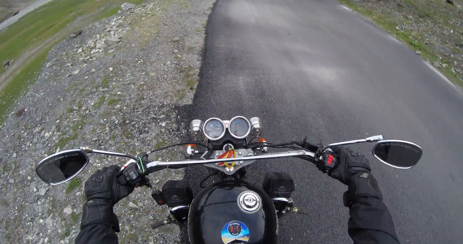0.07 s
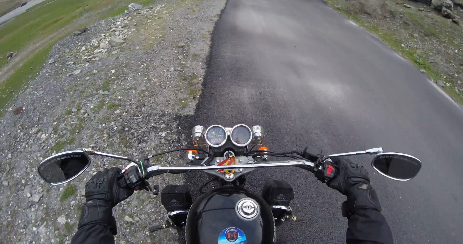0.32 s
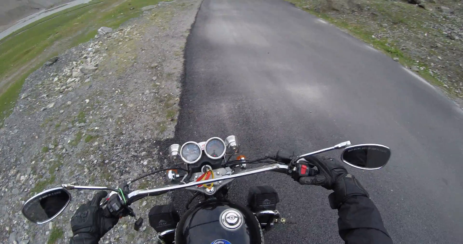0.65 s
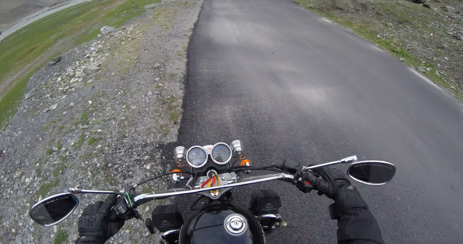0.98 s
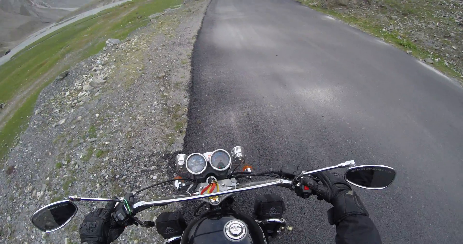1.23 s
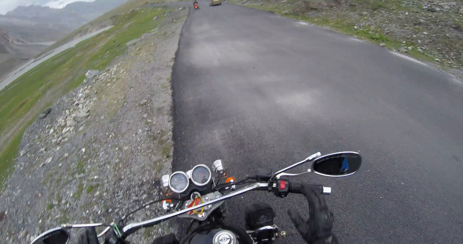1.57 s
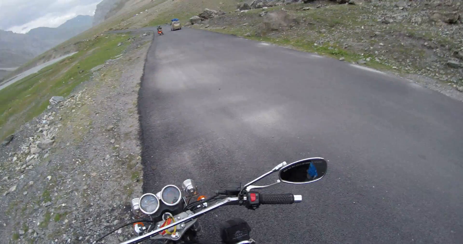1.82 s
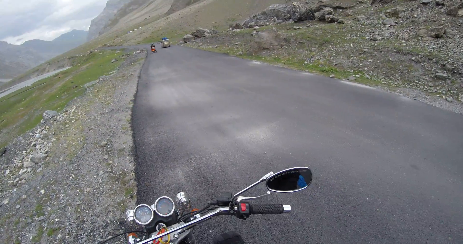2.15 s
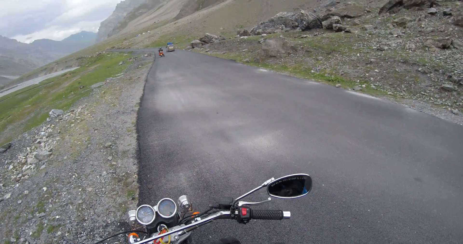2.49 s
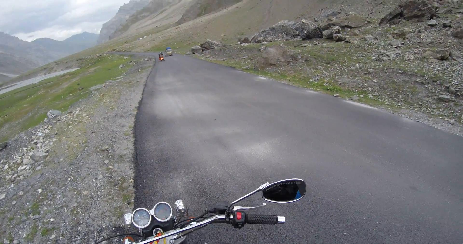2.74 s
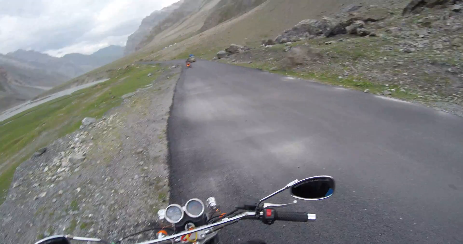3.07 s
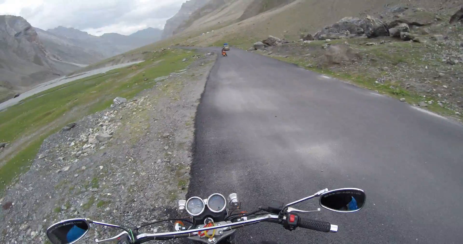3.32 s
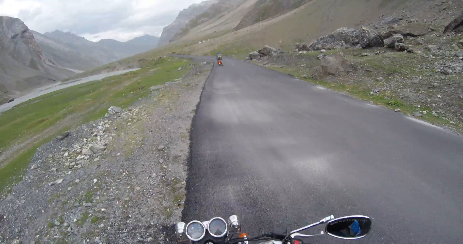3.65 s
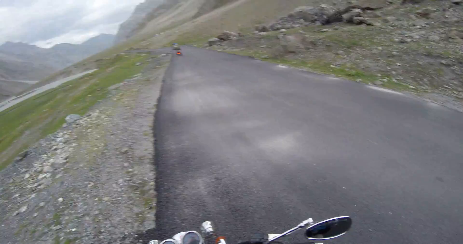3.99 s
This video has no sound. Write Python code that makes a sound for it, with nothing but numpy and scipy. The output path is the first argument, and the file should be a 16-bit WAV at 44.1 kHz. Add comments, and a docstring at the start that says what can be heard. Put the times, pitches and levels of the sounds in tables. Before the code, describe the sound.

A motorcycle idles in soft, muffled thuds, then slows and stops. Gloves and a jacket rustle, controls click and dull knocks bump the microphone, which sounds boxed in, with faint wind and a distant river underneath.

```python
"""Soft, muffled thuds of an idling single-cylinder motorcycle, which then slow and stop as it is switched off.
The rider's gloves and jacket rustle by stick-slip friction, controls click, and knocks set a camera
mount rocking. The listening point is inside the camera's closed case, whose resonances colour the
rustles and clicks. Faint wind, a distant river and a thin electronic whine lie underneath."""
import sys
import numpy as np
from scipy import signal
from scipy.fft import rfft, irfft
from scipy.io import wavfile

SR = 44100
rng = np.random.default_rng(int(sys.argv[2]) if len(sys.argv) > 2 else 0)


def generate_wav(signal):
    """Clip the signal to [-1, 1] and save it as 16-bit WAV at the path in sys.argv[1]."""
    frames = np.transpose(np.atleast_2d(signal))
    scaled = np.clip(frames, -1, 1) * 32767
    pcm = np.round(scaled).astype(np.int16)
    wavfile.write(sys.argv[1], SR, pcm)


N = 176400


def amp(db):
    """Decibels to amplitude ratio."""
    return 10 ** (np.asarray(db) / 20)


def unit(x):
    """Normalisation to rms 1."""
    return x / np.sqrt(np.mean(x ** 2) + 1e-20)


def spectrum_db(points, hz):
    """A spectrum interpolated on a log-frequency axis."""
    point_hz, db = np.transpose(points)
    return np.interp(np.log(hz + 1), np.log(point_hz), db)


def envelope(points):
    """A gain for every sample, interpolated in decibels."""
    return amp(np.interp(np.arange(N) / SR, *np.transpose(points)))


def stroke(centre_s, db, sigma_s):
    """The Gaussian swell and fade of one movement."""
    return amp(db) * np.exp(-.5 * ((np.arange(N) / SR - centre_s) / sigma_s) ** 2)


def add(mix, start_s, sound):
    """Superposition of a sound on the mix."""
    part = mix[max(round(start_s * SR), 0):][:len(sound)]
    part += sound[:len(part)]


def bins(size=8192):
    """The frequencies of a Fourier transform, in Hz."""
    return np.fft.rfftfreq(size, 1 / SR)


def above(edge_hz, order=8):
    """A shelf rising from 0 to 1 around the edge."""
    return 1 - 1 / (1 + (bins() / edge_hz) ** order)


def resonance(centre_hz, width_hz):
    """A Lorentzian peak, 1 at its centre."""
    return 1 / (1 + (2 * (bins() - centre_hz) / width_hz) ** 2)


def ring(modes, t):
    """Free vibration: a sum of damped sinusoids."""
    return sum(amp(db - 60 * t / t60) * np.sin(2 * np.pi * hz * t) for hz, db, t60 in modes)


def swing(t, width_s):
    """A pressure pulse: a rarefaction between two smaller compressions."""
    u = t / width_s
    return (2 * u ** 2 - 1) * np.exp(-u ** 2)


def noise(colour):
    """White noise filtered by rows of frequency_hz, relative_db; rms 1."""
    return unit(irfft(rfft(rng.standard_normal(N)) * amp(spectrum_db(colour, bins(N))), N))


def drift(rate_hz):
    """Slow random fluctuation: low-passed noise of rms 1."""
    return unit(irfft(rfft(rng.standard_normal(N)) * np.exp(-(bins(N) / rate_hz) ** 2), N))


def through_case(x, tone_db=0):
    """The resonant camera case acts as a minimum-phase filter; tone_db adds the source's own colour."""
    # broad response of the case: frequency_hz, relative_db
    case_colour = [(100, -23.5), (420, -10), (600, -21.5), (1000, -9), (1500, -7.5), (1950, -8.5),
                   (2400, -4), (2800, -11), (3150, -16.5), (3500, -20.5), (5200, -24.5), (6200, -21.5),
                   (7000, -32), (7700, -41.5), (11000, -46), (15000, -60.5)]
    # its resonances: centre_hz, width_hz, lift_db
    case_modes = [(677, 15, 8), (996, 120, 3.5), (1243, 113, 6.5), (1437, 56, 5), (1586, 76, 7.5),
                  (1760, 100, 4.5), (2190, 140, 6), (2338, 87, 4), (2458, 67, 6.5), (2633, 86, 4.5),
                  (2913, 190, 7.5), (3190, 130, 6.5), (4830, 110, 9.5), (5680, 140, 5.5)]
    db = spectrum_db(case_colour, bins())
    db += sum(lift * resonance(hz, width) for hz, width, lift in case_modes)
    log_gain = np.log(unit(amp(db)) * amp(tone_db))
    two_sided = np.concatenate([log_gain, log_gain[-2:0:-1]])
    impulse_response = np.fft.ifft(np.exp(np.conj(signal.hilbert(two_sided)))).real
    return signal.fftconvolve(x, impulse_response[:len(db)])


def river(level_db=-57, waver_db=.5):
    """Distant water and air merge into nearly steady broadband noise."""
    # spectral density: frequency_hz, relative_db
    colour = [(30, -1.5), (120, 1), (200, 1.5), (300, 2), (500, -3.5), (600, -2.5), (1000, -5.5),
              (2000, -8), (2600, -5.5), (3600, -10), (6500, -18.5), (8000, -22), (12000, -27),
              (15000, -33.5)]
    return noise(colour) * amp(level_db + waver_db * drift(15))


def wind():
    """Turbulent pressure buffets the case: a low rumble that swells in gusts."""
    # spectral density: frequency_hz, relative_db
    colour = [(10, -14.5), (25, -5.5), (43, -4), (60, -10.5), (100, -18), (135, -19.5), (180, -31.5),
              (300, -50), (1000, -75), (4000, -100)]
    # strength of the buffeting: time_s, level_db
    gusts = [(0, -44), (.6, -41.5), (1.05, -45.5), (1.35, -39), (1.6, -43), (2.05, -46.5), (2.25, -36.5),
             (2.4, -45.5), (2.85, -45), (2.98, -33), (3.2, -48.5), (3.35, -35.5), (3.7, -36), (3.88, -42),
             (4, -19)]
    return noise(colour) * envelope(gusts)


def electronics_whine(pulse_hz=12, waver_hz=14):
    """The camera's electronics emit thin tones, pulsed in amplitude and randomly modulated in pitch."""
    # partials: pitch_hz, level_db
    tones = [(7027, -73), (14062, -78.5)]
    t = np.arange(N) / SR
    gate = np.clip(.5 + 2 * np.cos(2 * np.pi * pulse_hz * t), 0, 1)
    out = np.zeros(N)
    for hz, db in tones:
        cycles = np.cumsum(hz + waver_hz * drift(54)) / SR
        out += amp(db) * np.sin(2 * np.pi * cycles)
    return gate * out


def friction(slips_per_s=3500, spread_db=2.5, flutter_db=.65):
    """Stick-slip friction: dense tiny impulses of uneven strength over a hiss."""
    slips = (rng.random(N) < slips_per_s / SR) * rng.standard_normal(N)
    slips *= amp(spread_db * np.minimum(rng.exponential(1, N), 4))
    rubbing = unit(.45 * unit(slips) + .5 * rng.standard_normal(N))
    return rubbing * amp(flutter_db * drift(27))


def cloth():
    """Friction noise follows the motion of sleeve and gloves and is filtered by the case."""
    # sleeve rubbing as the arm moves: time_s, level_db
    sleeve = [(0, -61), (.5, -62.5), (1.3, -62.5), (1.52, -62.5), (1.75, -61), (2.1, -61), (2.37, -76),
              (2.47, -49), (2.53, -58), (2.78, -56), (2.95, -59), (3.24, -53), (3.28, -53.5), (3.42, -42.5),
              (3.47, -49.5), (3.57, -42), (3.7, -42), (3.98, -38)]
    # brushes of glove and cloth: centre_s, level_db, sigma_s, low_db, high_db, rasp_hz, rasp_db
    brushes = [(.01, -56.5, .05, 1.5, 12.5, 3570, 15.5), (0.22, -55.5, 0.066, -0.5, 11, 3460, 11),
               (0.515, -61.5, 0.013, -3, 18, 3360, 13), (0.658, -53.5, 0.013, -16, 12, 3600, 11),
               (0.863, -57.5, 0.055, -9, 5, 3520, 7), (1.423, -54, .014, -4.5, -6, 1900, 9),
               (1.603, -56, 0.017, -2, 0, 2400, 5), (1.928, -59, 0.091, -5, 9, 2500, 10.5),
               (2.224, -49, 0.047, -19, 1.5, 2730, -3), (2.45, -63, 0.026, -3, 7, 2420, 12),
               (2.58, -66, 0.02, -19, -4, 2550, 15), (3.075, -55, 0.067, -3.5, 9.5, 2460, 8),
               (3.223, -44, 0.021, -20, -2, 2200, 2.5)]
    slips = friction()
    out = through_case(friction() * envelope(sleeve), -2 * above(4500))[:N]
    for centre_s, db, sigma_s, low_db, high_db, rasp_hz, rasp_db in brushes:
        tone_db = low_db * (1 - above(1400)) + high_db * above(3700)
        tone_db += rasp_db * resonance(rasp_hz, width_hz=960)
        out += through_case(slips * stroke(centre_s, db, sigma_s), tone_db)[:N]
    return out


def mount_rubbing():
    """Friction on the mount arrives as dull structure-borne noise when the rider shifts."""
    # the rider's movements: centre_s, level_db, sigma_s
    shifts = [(0.725, -52.5, 0.13), (1.437, -40.5, 0.03), (2.193, -53.5, .05), (2.5, -46, 0.017),
              (2.963, -49, 0.1), (3.334, -50, .025), (3.852, -44, 0.35)]
    # spectral density: frequency_hz, relative_db
    colour = [(40, 3), (90, 0.5), (135, 4), (180, -5.5), (300, -18), (500, -24), (700, -18), (4000, -65)]
    return noise(colour) * sum(stroke(*row) for row in shifts)


def contact_force(decay_s, soft_contact_s=.0055):
    """An impact is an impulse followed by a brief scrape whose treble dies first."""
    t = np.arange(0, .06, 1 / SR)
    grit = rng.standard_normal(len(t))
    body = signal.sosfiltfilt(signal.butter(4, 3600, fs=SR, output="sos"), grit)
    treble = 1.35 * (grit - body) * np.exp(-t / (2.1 * decay_s))
    rise = 1 - np.exp(-t / (.56 * decay_s))
    scrape = (body + treble) * rise * np.exp(-t / decay_s)
    snap = 1.06 * np.exp(-(decay_s / soft_contact_s) ** 2)  # long contacts start softly
    force = unit(scrape) + snap * unit(1. * (t == 0))
    return force * np.sqrt(decay_s / t[-1])


def control_clicks():
    """Short impacts excite a resonance of the struck part and those of the case."""
    # clicks and knocks: start_s, level_db, decay_s, low_db, high_db, top_db, part_hz, part_db
    contacts = [(0.3179, -31, 0.004, -20, 2, 2, 3350, 11.5), (2.1724, -37.5, 0.0031, 2.5, -17, 10, 1270, 4),
                (2.479, -42.5, 0.004, 12.5, 3.5, 3, 1500, 8), (2.623, -44, 0.0036, -5, -18, 0, 1400, 3.5),
                (2.6728, -30.5, 0.0024, -4, 15, -14, 2050, 11.5),
                (2.7151, -37, 0.0021, -26, -5, -3, 1690, -5), (2.7224, -45, 0.0015, 5, 14, -9, 6200, 5),
                (2.807, -40, 0.0032, -48, 7.5, 3, 4700, 2), (3.009, -40, .007, 7, 4, -5, 1040, 8),
                (3.02, -37.5, 0.0033, 11.5, 15.5, 9.5, 10210, 13),
                (3.2943, -27.5, 0.007, -18, -2.5, -8, 4700, 10),
                (3.2968, -20.5, 0.0032, 1.5, -7, -9.5, 2480, 5.5),
                (3.392, -30, 0.008, -1.5, 5.5, -12, 1170, 2.5),
                (3.4006, -31.5, 0.0024, -9, 8.5, -8, 6840, 7.5),
                (3.805, -29, 0.0025, -4, -29, -11, 1260, 0),
                (3.814, -36.5, 0.0016, -11, 7.5, -10, 2310, 16)]
    out = np.zeros(N)
    for start_s, db, decay_s, low_db, high_db, top_db, part_hz, part_db in contacts:
        tone_db = low_db * (1 - above(930, order=4)) + high_db * above(4300) + top_db * above(7500)
        tone_db += part_db * resonance(part_hz, width_hz=290)
        add(out, start_s, amp(db) * through_case(contact_force(decay_s), tone_db))
    return out


def mount_knocks(lead_s=.04):
    """Soft force pulses excite the low, damped modes of the camera mount and its stiff bracket."""
    # pushes on the mount: centre_s, force_db, width_s, bracket_gain, direction_sign
    pushes = [(1.398, -53, 0.0031, 0.35, 1), (2.17, -31, 0.0049, 0.83, 1), (2.528, -31.5, 0.006, 0.39, 1),
              (2.912, -64, .003, 0.72, 1), (3.015, -28.5, .003, 1.7, -1), (3.054, -45.5, 0.0014, 2.1, 1),
              (3.308, -36.5, 0.002, 2.6, 1), (3.404, -19.5, 0.0032, 0.11, -1),
              (3.417, -14.5, 0.0083, .1, 1), (3.758, -26.5, 0.0056, 0.57, -1),
              (3.959, -20.5, 0.0034, 0.21, 1)]
    # rocking mode of the mount: pitch_hz, gain_db, t60_s
    mount_modes = [(42.2, 8, 0.6)]
    # modes of the bracket: pitch_hz, gain_db, t60_s
    bracket_modes = [(90.6, 15, 0.082), (129.6, 7.5, 0.3)]
    t, out = np.arange(0, 1, 1 / SR), np.zeros(N)
    for centre_s, db, width_s, bracket_gain, direction in pushes:
        force = np.exp(-((t - lead_s) / width_s) ** 2)
        impulse_response = ring(mount_modes, t) + bracket_gain * ring(bracket_modes, t)
        rocking = signal.fftconvolve(force / force.sum(), impulse_response)
        add(out, centre_s - lead_s, direction * amp(db) * rocking)
    return out


def engine(first_beat_s=.0748, period_s=.1126, idle_beats=11, coast_beats=5, slowing=.019):
    """A pulse train of exhaust thuds and intake gulps, weaker and ever slower once the engine coasts."""
    # damped thump of one beat: pitch_hz, relative_db, t60_s
    thump_modes = [(41.6, -14.5, 0.14), (86, -3, 0.12), (126, -9.5, 0.2)]
    lead_s, puff_decay_s = .03, .029
    exhaust_db, intake_db, coast_drop_db = -36, -39.5, -2
    t, out = np.arange(-lead_s, .4, 1 / SR), np.zeros(N)
    age_s = np.maximum(t, 0)
    cycles_coasted = np.maximum(np.arange(idle_beats + coast_beats) - idle_beats + 1, 0)
    gaps_s = period_s * (1 + slowing * cycles_coasted ** 2)
    beats_s = first_beat_s - period_s + np.cumsum(gaps_s)
    gas = noise([(40, 31), (130, -18), (250, -17), (500, -19), (2000, -43), (8000, -80)])
    for beat_s, gap_s, coasted in zip(beats_s, gaps_s, cycles_coasted):
        flow = np.roll(gas, -round(beat_s * SR))[:len(t)]
        puff = amp(-18) * (t > 0) * np.exp(-age_s / puff_decay_s) * flow
        exhaust = amp(exhaust_db) * (swing(t, width_s=.0048) + puff + ring(thump_modes, age_s))
        intake = amp(intake_db) * swing(t - gap_s / 2, width_s=.016)  # half a cycle later
        add(out, beat_s - lead_s, amp(coast_drop_db * (coasted > 0)) * (exhaust + intake))
    return out


def scene():
    """The pressures of all sources add at one listening point."""
    out = engine() + cloth() + mount_rubbing() + wind() + river() + electronics_whine()
    out += control_clicks() + mount_knocks()
    return out[None]


def record(dry):
    """A linear-phase low-pass filter limits the bandwidth."""
    cutoff_hz = 15200
    low_pass = signal.firwin(511, cutoff_hz, window=("kaiser", 9), fs=SR)
    return signal.oaconvolve(dry, low_pass[None], "same")


dry = scene()
out = record(dry)
generate_wav(out)
```